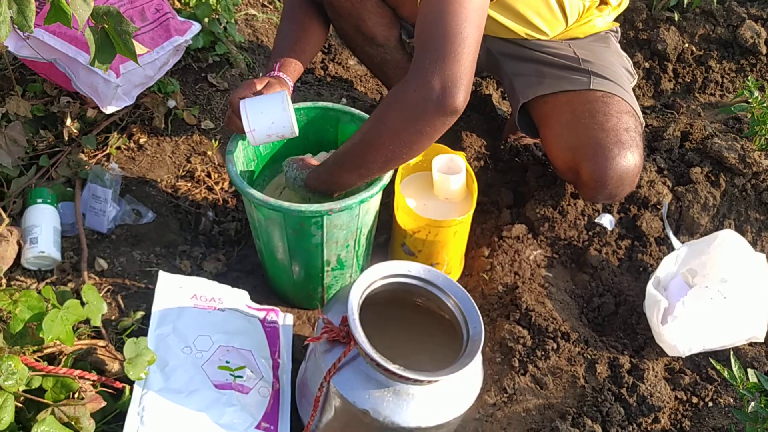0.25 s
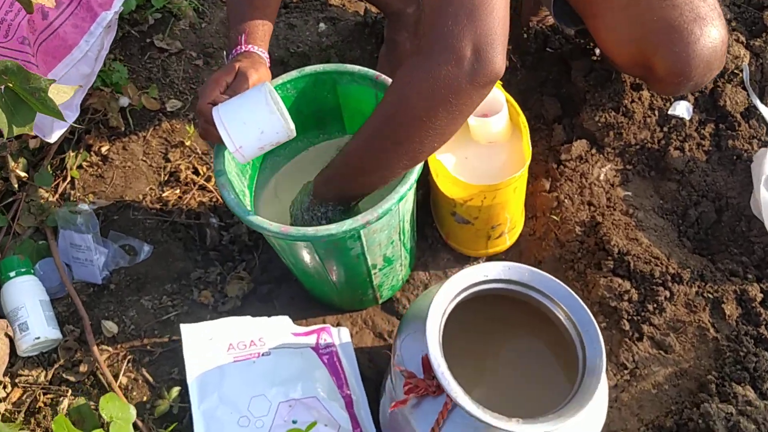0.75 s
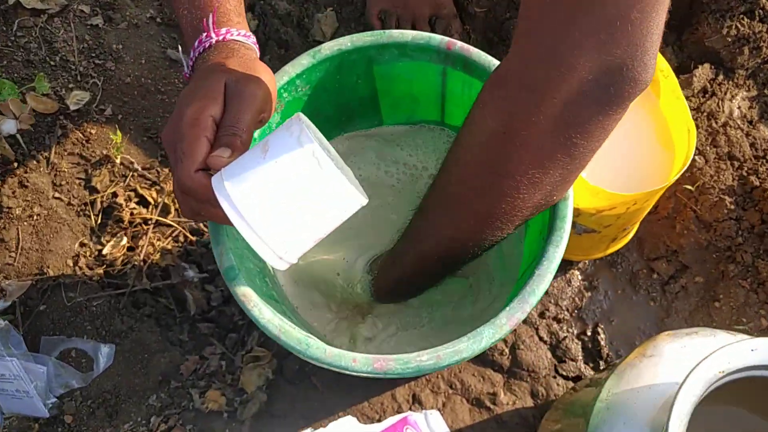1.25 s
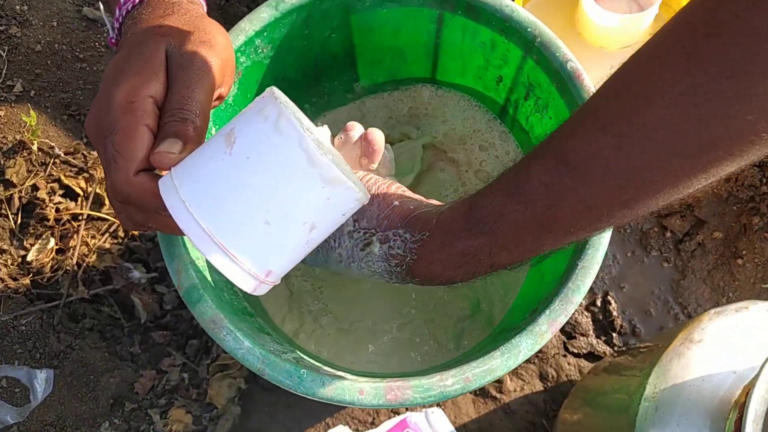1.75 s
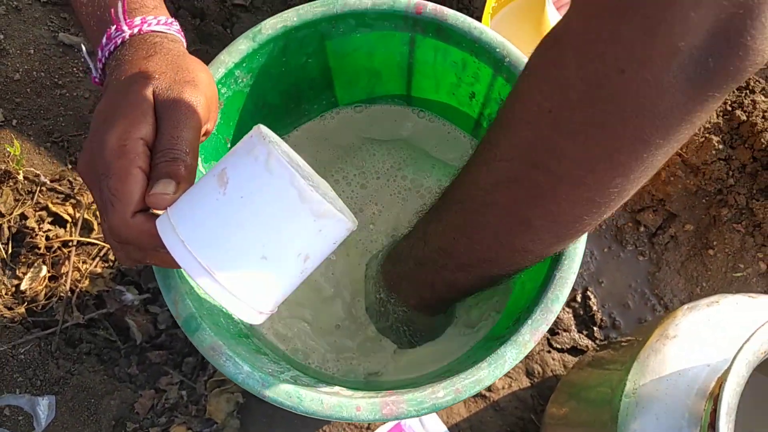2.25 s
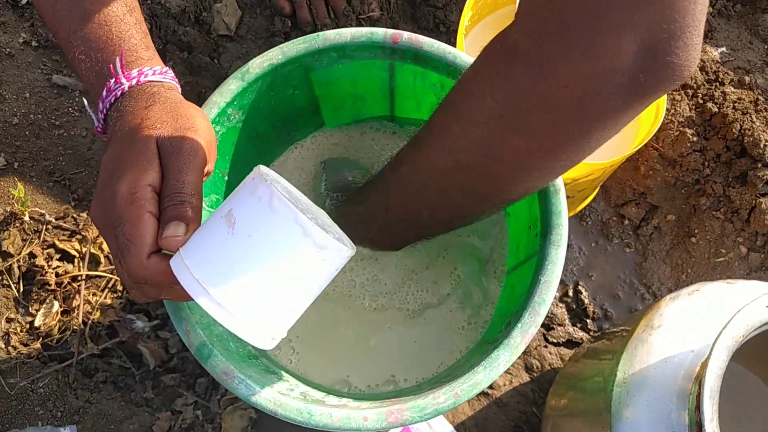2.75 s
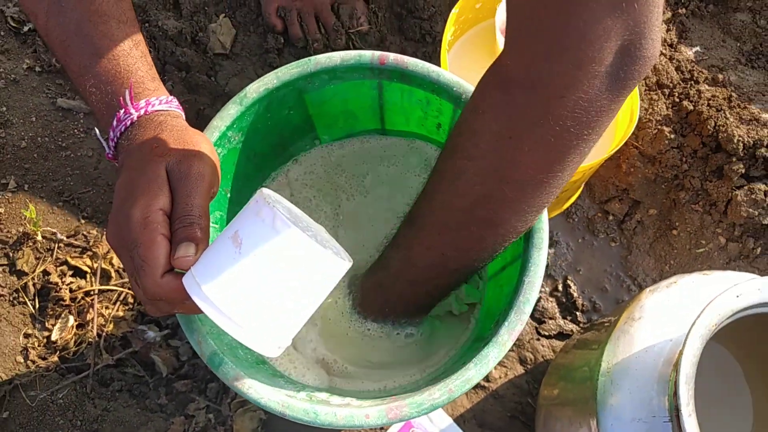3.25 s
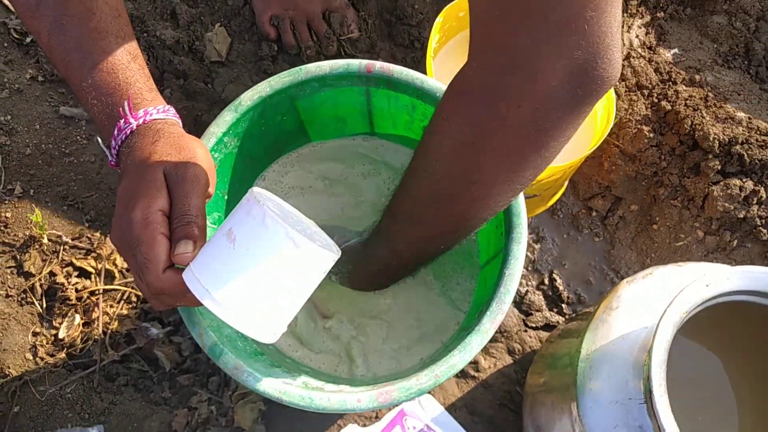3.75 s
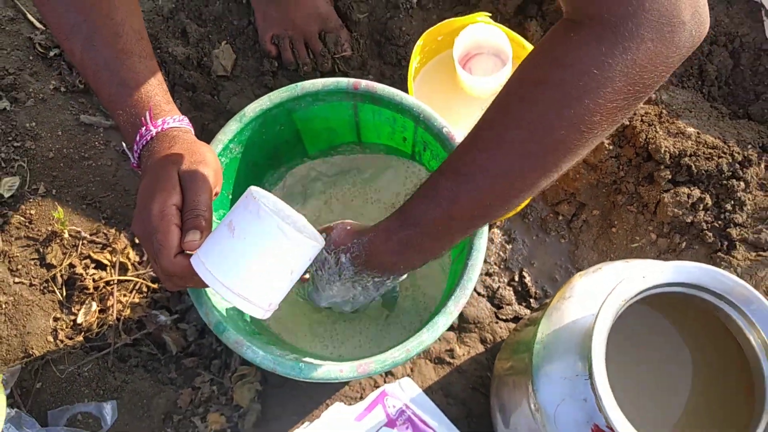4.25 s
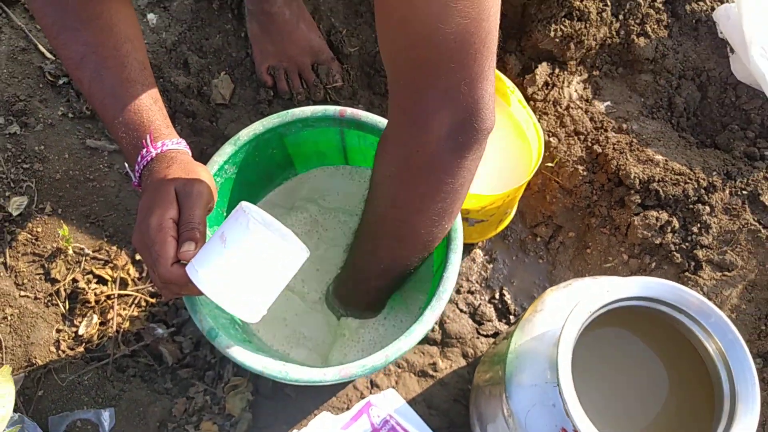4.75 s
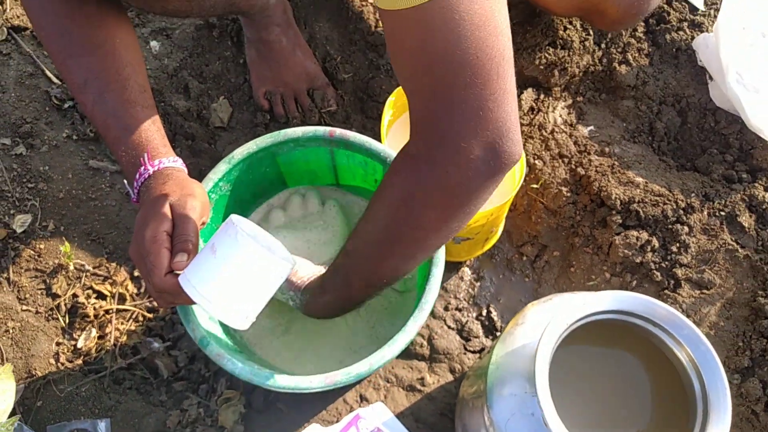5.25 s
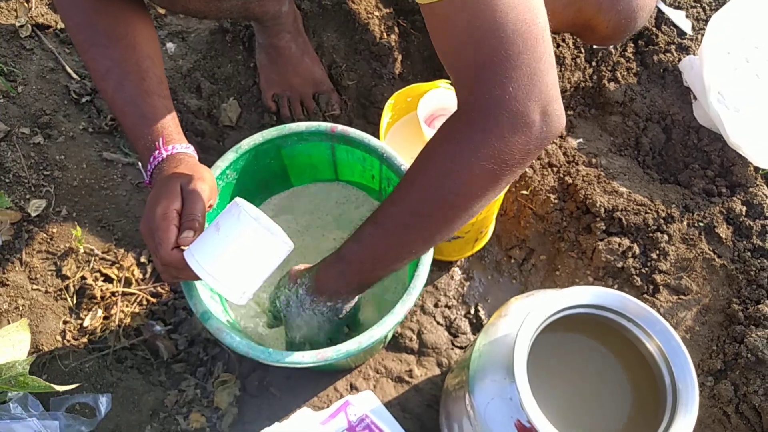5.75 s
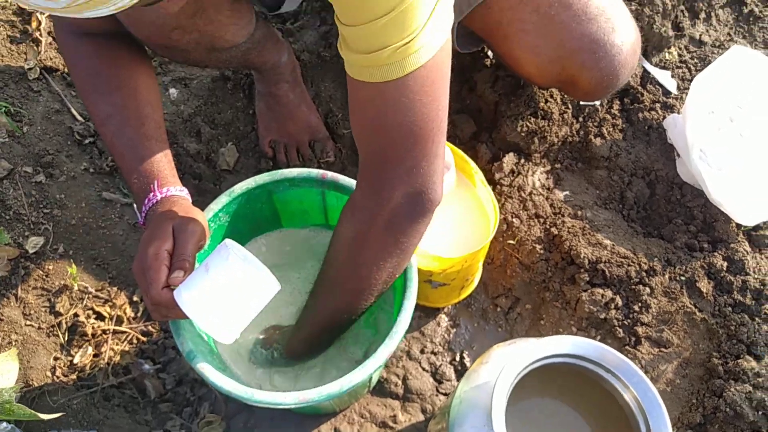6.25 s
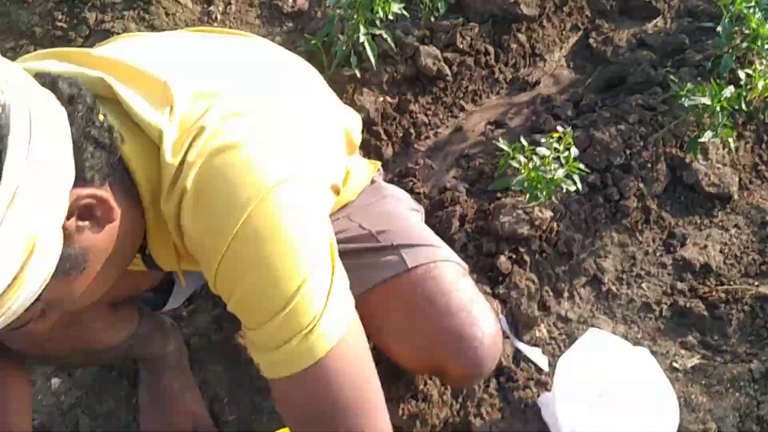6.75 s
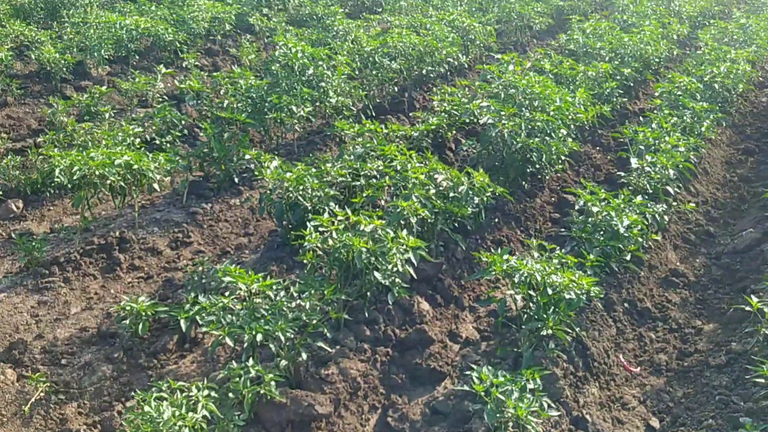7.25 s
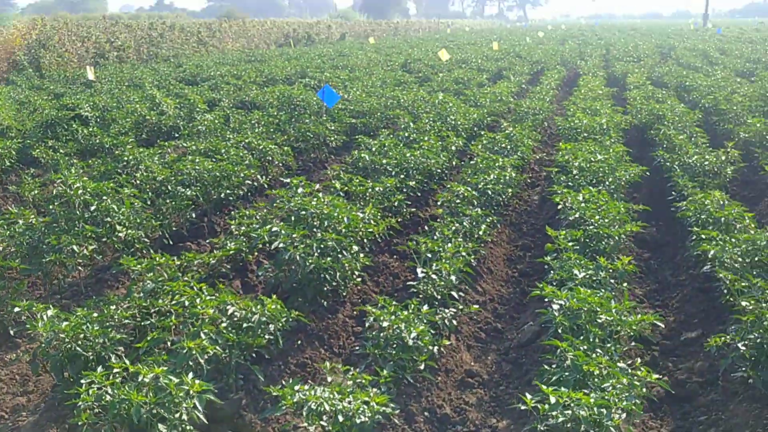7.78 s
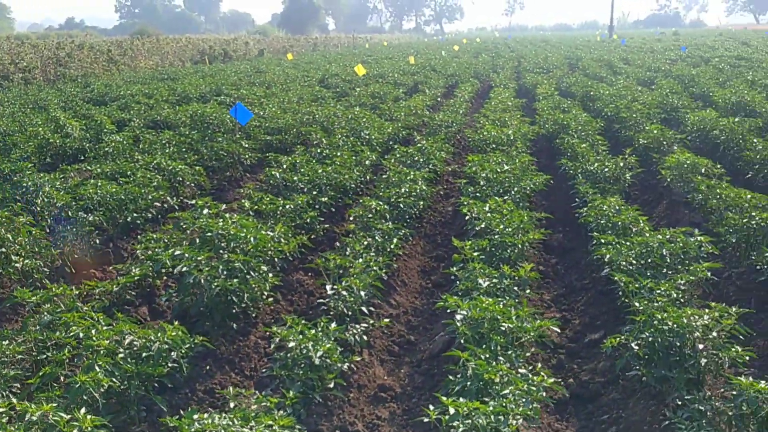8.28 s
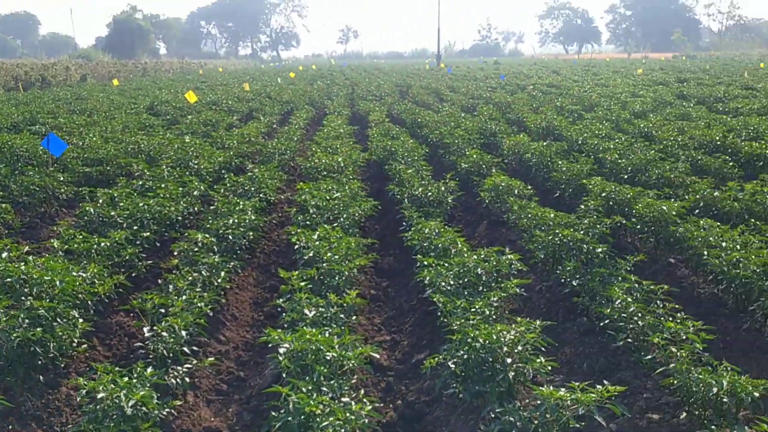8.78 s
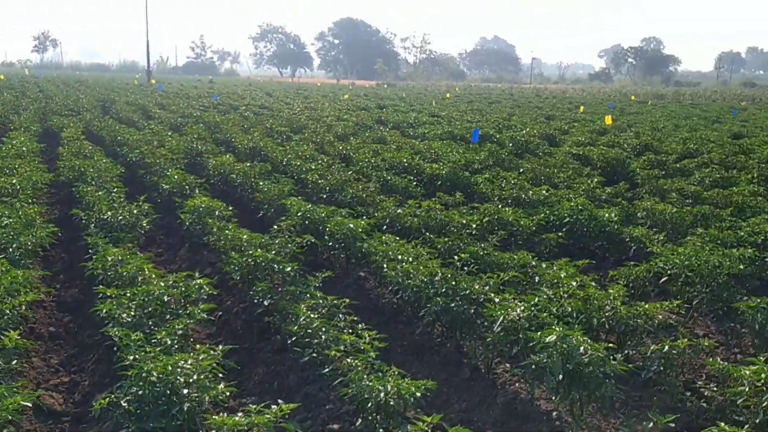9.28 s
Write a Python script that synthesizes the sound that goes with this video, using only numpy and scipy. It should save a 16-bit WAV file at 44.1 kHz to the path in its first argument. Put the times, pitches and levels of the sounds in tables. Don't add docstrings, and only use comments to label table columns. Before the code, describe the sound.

A close stereo phone hears a hand stirring thin slurry in a plastic bucket in an open field, over steady soft hiss and low light wind. At 0.25 s a spatter and one very sharp drop hit the phone at the right, with a lighter one at 0.3. Small swishes follow to 1.2 s. From 1.4 to 2.3 s stirring is busiest, peaking at 1.9 with bright fizz, crackling film snaps and round bubble plops. A lull with deep bubbles leads to wet bursts at 3.1 to 4.6 s. It calms near 5, a faint bird whistling at 5.15, then sloshes again from 5.4 to 7.2. A wind gust rumbles at 6.8 to 7. Distant bird notes rise at 7.3, a drip chirps upward at 7.45, and a small splash comes at 8.0. Quiet hiss remains to 9.5, with an extremely faint falling bird call near 8.9.

```python
import sys
import numpy as np
from scipy import signal
from scipy.fft import irfft
from scipy.io import wavfile
from scipy.ndimage import uniform_filter1d

SR = 44100
rng = np.random.default_rng(int(sys.argv[2]) if len(sys.argv) > 2 else 0)


def gain_from_decibels(decibels):
    exponent = np.asarray(decibels, float) / 20
    return 10 ** exponent


def transcribe(u):
    v = np.clip(np.atleast_2d(u).T, -1, 1)
    q = np.round(v * 32767).astype(np.int16)
    wavfile.write(sys.argv[1], SR, q)


N = 419831

PORT_HZ = 8930
LAG = 12.5
LOW_LAG = 4.4


def read(points, hz):
    f, value = np.transpose(points)
    return np.interp(np.log(hz + 1), np.log(f + 1), value)


def curve(rows):
    s, *columns = np.transpose(rows)
    return [np.interp(np.arange(N) / SR, s, c) for c in columns]


def evened(x):
    return x / np.sqrt(np.mean(x ** 2) + 1e-20)


def coloured(x, db, lag=0):
    hz = np.fft.rfftfreq(2048, 1 / SR)
    log_gain = np.log(gain_from_decibels(np.maximum(db(hz), -80)))
    mirrored = np.r_[log_gain, log_gain[-2:0:-1]]
    phase = -signal.hilbert(mirrored).imag[:len(hz)]
    response = np.exp(log_gain + 1j * (phase - 2 * np.pi * hz * lag / SR))
    return signal.oaconvolve(x, irfft(response))[:N]


def flicker(count):
    return evened(signal.lfilter([1], [1, -np.exp(-2 * np.pi * count / SR)], rng.standard_normal(N)))


def add(mix, s, sound, pan_db=0, lag=LAG):
    for side, late, db in ((0, lag, min(pan_db, 0)), (1, 0.0096, min(-pan_db, 0))):
        part = mix[side, round(s * SR + late):][:len(sound)]
        part += gain_from_decibels(db) * sound[:len(part)]


def ring(hz, t60, rise=0, soft=.001):
    t = np.arange(int(t60 * SR) + 20) / SR
    phase = 2 * np.pi * np.cumsum(hz * (1 + rise * t / t60)) / SR
    sound = np.sin(phase) * gain_from_decibels(-60 * t / t60) * (1 - np.exp(-t / soft))
    return sound / abs(sound).max()


def scattered(sound, per_s, spread_db, cap):
    luck = rng.random((round(per_s * N / SR), 2))
    at = (luck[:, :1] * N).astype(int) + np.arange(len(sound))
    size = gain_from_decibels(spread_db * np.minimum(-np.log(luck[:, 1:] + 1e-9), cap))
    return np.bincount(at.ravel(), (size * sound).ravel(), N)[:N]


def swells(steady_db, rows):
    t = np.arange(0, N, 64) / SR
    power = gain_from_decibels(2 * (steady_db + np.zeros(N))[::64])
    for s, db, rise, fall in rows:
        power = power + gain_from_decibels(2 * db - 40 * np.maximum((s - t) / rise, (t - s) / fall))
    return np.interp(np.arange(N) / SR, t, 10 * np.log10(power))


def churn(size, colour_db, same, lag, clump_db, patch_db, patch_s, patch_hz):
    hop, hz = size // 4, np.fft.rfftfreq(size, 1 / SR)[:, None]
    a, b, c, d, patches = rng.standard_normal((N // hop + 5, len(hz), 5)).T
    patches = uniform_filter1d(patches, max(round(patch_hz / hz[1, 0]), 1), 0)
    patches = evened(uniform_filter1d(patches, max(round(patch_s * SR / hop), 1), 1))
    right = a + 1j * b
    shared = same * right * np.exp(-2j * np.pi * hz * lag / SR)
    left = shared + np.sqrt(1 - same ** 2) * (c + 1j * d)
    z = gain_from_decibels(colour_db(hz) + patch_db * patches) * np.array([left, right])
    noise = signal.istft(z, nperseg=size, noverlap=size - hop)[1][:, :N]
    return evened(gain_from_decibels(clump_db * flicker(count=22)) * noise)


# (frequency [Hz], level [dB per Hz])
WIND_COLOUR = [(12, -31.5), (20, -2), (33, -5), (50, 4), (70, -3), (160, -14), (300, -30.5), (390, -61),
               (660, -120)]
# (crest time [s], crest level [dB], rise per 20 dB [s], fall per 20 dB [s])
LEFT_GUSTS = [
    (1.11, -46, .5, .4),
    (6.8, -40, .08, .35),
    (6.95, -43, .2, .2),
]
RIGHT_GUSTS = [
    (.79, -54, 1.5, .9),
    (1.11, -55, .5, .6),
    (3.26, -59, 3, 1.5),
    (6.95, -48.5, .2, .3),
    (7.21, -50, .4, .3),
]


def wind():
    ports = ((-60.5, LEFT_GUSTS), (-61.5, RIGHT_GUSTS))
    db = np.array([swells(breeze_db, gusts) for breeze_db, gusts in ports])
    left, right, common = rng.standard_normal((3, N))
    rumble = [evened(coloured(own + 0.3 * common, lambda hz: read(WIND_COLOUR, hz))) for own in (left, right)]
    return gain_from_decibels(db - 3.7) * rumble


# (frequency [Hz], level [dB per Hz])
HISS_COLOUR = [(59, -23.5), (100, 0.5), (570, -9), (721, -10.5), (1230, -15.5), (2130, -17.5), (2630, -21),
               (4200, -20.5), (9000, -13.5), (10600, -23), (16000, -29)]


def hiss():
    out = [coloured(rng.standard_normal(N), lambda hz: read(HISS_COLOUR, hz)) for _ in "lr"]
    return gain_from_decibels(-71.5 + 4.0) * evened(np.array(out))


# (time [s], steady spray level [dB], gurgle above its share of the spray [dB])
STIR = [(0.0, -69.0, -4.0), (0.3, -61.0, -5.0), (0.8, -83.0, -4.0), (1.2, -59.0, -6.0), (1.45, -49.0, -3.0),
        (1.75, -79.0, -9), (2.0, -48.0, -12.5), (2.25, -74.0, -6.5), (2.7, -78.0, -0.5), (3.0, -58.0, -9.0),
        (3.4, -67.0, -1.0), (3.6, -63.0, -7.0), (4.6, -74.0, -5.5), (5.3, -79.0, -8.0),
        (5.75, -62.0, -13.0), (6.6, -58, -3.5), (7.4, -75.0, -1.0), (9.52, -74.0, -24)]
# (crest time [s], crest level [dB], last 20 dB of rise [s], first 20 dB of fall [s])
SPLASHES = [(0.262, -50, 0.012, 0.09), (0.429, -47.5, 0.18, 0.35), (0.828, -50.5, 0.02, 0.1),
            (1.019, -44.0, 0.12, 0.21), (1.676, -42.5, 0.32, 0.42), (1.905, -35.0, 0.09, 0.2),
            (2.158, -42, 0.14, 0.03), (2.327, -46.0, 0.15, 0.03), (2.575, -55.0, 0.6, 0.41),
            (2.818, -54.0, 0.05, 0.04), (3.087, -47.5, 0.04, 0.06), (3.386, -44.0, 0.29, 0.09),
            (3.606, -49.0, 0.02, 0.13), (3.751, -42.5, 0.05, 0.06), (3.889, -49.5, 0.04, 0.29),
            (4.041, -42.5, 0.07, 0.18), (4.303, -45.5, 0.4, 0.05), (4.561, -48.0, 0.05, 0.1),
            (5.237, -60.5, 0.86, 0.28), (5.429, -47.0, 0.12, 0.1), (5.609, -41.0, 0.19, 0.12),
            (5.908, -48.5, 0.02, 0.08), (6.032, -51.5, 0.03, 0.08), (6.129, -42.0, 0.06, 0.03),
            (6.286, -49.5, 0.02, 0.26), (6.622, -45.0, 0.09, 0.29), (6.91, -43.0, 0.08, 0.16),
            (7.175, -52, 0.04, 0.06), (7.736, -65.0, 0.09, 0.14), (7.999, -48.0, 0.05, 0.36)]


def spray_db():
    return swells(curve(STIR)[0], SPLASHES)


def kicked():
    lull_db, kick_s = -4.5, .02
    tears = np.zeros(N)
    tears[[round(row[0] * SR) for row in SNAPS + PLINKS + CRACKS]] = 1
    kick = np.minimum(signal.lfilter([1], [1, -np.exp(-1 / (kick_s * SR))], tears), 1)
    return gain_from_decibels(lull_db * (1 - kick))


# (frequency [Hz], level [dB per Hz])
SPRAY_COLOUR = [(880, -28), (1500, -7), (3180, -6.5), (4300, -6), (6690, -7), (9220, 4), (10400, -5),
                (15200, -21.5), (16000, -25), (16500, -42)]


def spray_colour_db(hz):
    return read(SPRAY_COLOUR, hz)


def spits():
    decay = gain_from_decibels(-60 * np.arange(900) / SR / .014)
    bursts = scattered(decay, 70, 4.5, 2.4) * rng.standard_normal((2, N))
    return evened(np.array([coloured(x, spray_colour_db) for x in bursts]))


def droplets():
    out = np.zeros((2, N))
    for hz in np.geomspace(1300, 7500, 20):
        drop = np.sqrt(hz) * ring(hz, 30 / hz + .004, .15, soft=1.5 / hz)
        drops = scattered(drop, 18, 4.5, 2.6)
        out += [np.roll(drops, rng.integers(4, 14)), drops]
    return evened(out)


def spray():
    fizz = churn(size=256, colour_db=spray_colour_db, same=0.28, lag=LAG,
                 clump_db=4.0, patch_db=5.0, patch_s=.009, patch_hz=700)
    pop_size = gain_from_decibels(2.8 * np.minimum(rng.exponential(1, N), 3.5))
    pops = pop_size * (rng.random(N) < 350 / SR) * rng.choice([-1, 1], N)
    pops = evened(np.array([coloured(pops, spray_colour_db, lag) for lag in (LAG, 0)]))
    mixed = .9 * fizz + .25 * pops + .33 * spits() + .4 * droplets()
    return gain_from_decibels(spray_db() + 4.3) * kicked() * mixed


# (frequency [Hz], width [Hz], level [dB])
BUCKET = [(400, 43, -0.5), (870, 37, 2.5), (1216, 280, -1), (1600, 210, -13), (2800, 1100, -3)]


def bucket_db(hz):
    return 10 * np.log10(sum(gain_from_decibels(2 * db) / (1 + (2 * (hz - f) / w) ** 2) ** 1.47 for f, w, db in BUCKET))


def gurgle():
    share, usual_db = .7, -55
    level_db = usual_db + share * (spray_db() - usual_db) + curve(STIR)[1]
    slosh = churn(size=512, colour_db=bucket_db, same=0.98, lag=LOW_LAG,
                  clump_db=5.5, patch_db=5.0, patch_s=.02, patch_hz=200)
    blips = np.zeros(N)
    for hz in np.geomspace(340, 6500, 30):
        blip = ring(hz, 22 / hz + 0.0019, 0.5, soft=2.2 / hz)
        blips += gain_from_decibels(bucket_db(hz)) * np.sqrt(hz) * scattered(blip, 22, 3.5, 2.8)
    blips = evened(np.array([np.roll(blips, 6), blips]))
    return gain_from_decibels(level_db - .6) * np.sqrt(kicked()) * (.8 * slosh + 1.1 * blips)


# (time [s], peak level [dB], left-right [dB])
SNAPS = [(.3898, -31, 20), (.4361, -27.5, 17), (1.4648, -32, -2), (1.5694, -32, 2.5), (1.736, -27.5, 2),
         (1.792, -32, -2), (1.8618, -26, 11), (1.8805, -21.5, 11), (2.1207, -28, -2), (2.254, -35.5, 2),
         (2.5154, -41, 21), (2.6066, -31, 1.5), (3.344, -22, -2), (3.3668, -22, 6.5), (3.355, -26, 0),
         (3.6152, -29.5, 10), (3.904, -33, 23), (3.967, -33, -3), (4.145, -33.5, 14), (4.2249, -20, 3),
         (4.3087, -30, 3), (4.5176, -32.5, 5), (4.57, -25.5, 4), (5.2218, -33, 1), (5.4078, -32, 3.5),
         (5.483, -33.5, 11), (5.5445, -24, 9.5), (5.6167, -22, -1), (5.887, -39.5, 5), (6.136, -29, 3)]
# (time [s], peak level [dB], left-right [dB], plink [Hz])
PLINKS = [(.0921, -39, .5, 2280), (.823, -42, -2, 2620), (1.6625, -26.5, 7, 5280), (1.716, -31.5, .5, 5700),
          (2.0302, -31, 4, 2980), (2.149, -35, 2, 3020), (2.6023, -39, 19, 1800), (2.81, -43.5, 6, 1850),
          (3.0925, -29.5, -4.5, 3740), (3.2567, -34.5, -8, 2550), (3.5969, -34.5, 2, 2730),
          (3.6678, -36, 1, 3100), (3.736, -33.5, 7, 3000), (4.0522, -28.5, .5, 3730),
          (4.1003, -32.5, 5, 2500), (4.2543, -31.5, 15, 2020), (4.5503, -34, 2, 3210),
          (4.712, -42, 3, 3000), (4.9208, -41, -1, 4530), (5.029, -41, 0, 4840), (5.136, -40, 3, 6000),
          (5.3458, -44, 0, 2110), (5.5236, -33.5, 9, 4170), (5.916, -37, 4, 3670), (6.282, -36, 5, 2750),
          (6.8944, -35, -6, 5000), (6.9101, -28, 1, 2200), (7.1626, -35, -2, 4970),
          (7.1885, -37, 1.5, 2300)]


def snaps():
    out, t = np.zeros((2, N)), np.arange(1500) / SR
    thin = [(*row, rng.uniform(2200, 4800), -26) for row in SNAPS]
    thick = [(*row, -13) for row in PLINKS]
    rows = thin + thick
    port = ring(PORT_HZ, 0.002, soft=0.00011)
    port[:60] += 0.33 * ring(11800, 0.0012, soft=0.0001)[:60]
    for (s, db, pan_db, plink_hz, plink_db), luck in zip(rows, rng.random((len(rows), 2))):
        dying = gain_from_decibels(-60 * t / (0.007 + 0.014 * luck[0]))
        hissing, dull, tearing = rng.standard_normal((3, len(t))) * dying * (1 - np.exp(-t / .0005))
        clicks = tearing * (rng.random(len(t)) < 1300 / SR)
        clicks[8] = 1.35
        sound = np.convolve(clicks, port)[:len(t)]
        sound += 0.23 * signal.lfilter(*signal.iirpeak(PORT_HZ, 1.3, SR), hissing)
        plink = signal.lfilter(*signal.iirpeak(plink_hz, 4.0, SR), dull)
        sound = sound / abs(sound).max() + gain_from_decibels(plink_db + 8) * plink / abs(plink).max()
        add(out, s, gain_from_decibels(db + 9.5) * sound, pan_db, LAG * (.6 + .5 * luck[1]))
    return out


# (time [s], peak level [dB], pitch [Hz])
BUBBLES = [(.29, -31.5, 1103), (.841, -43.5, 1590), (1.59, -37, 1200), (1.609, -32, 1140),
           (1.644, -24, 1183), (1.663, -29, 1420), (1.716, -41, 1140), (1.744, -36.5, 2135),
           (1.771, -38.5, 1290), (1.859, -35.5, 2380), (1.899, -36.5, 1090), (2.084, -41, 2190),
           (2.308, -31.5, 2200), (2.447, -38, 2370), (3.069, -41, 1280), (3.344, -41, 1090),
           (3.737, -42, 1230), (4.031, -36, 2400), (4.057, -38, 1613), (4.257, -35.5, 1970),
           (4.547, -40, 1530), (4.571, -41, 1405), (5.444, -42, 1780), (5.562, -40.5, 1690),
           (6.544, -41.5, 1420), (6.644, -39, 1500), (6.718, -40, 1550), (6.779, -37, 1120),
           (7.001, -42, 1400), (7.156, -41.5, 1590)]
# (time [s], peak level [dB], pitch [Hz])
MIDDLE_BUBBLES = [(.092, -46, 1750), (.476, -44.5, 910), (1.112, -40, 910), (1.46, -39.5, 870),
                  (2.639, -37, 874), (2.878, -42, 790), (3.09, -42.5, 840), (3.253, -44.5, 874),
                  (4.326, -44.5, 1156), (5.306, -46, 1440), (5.425, -39.5, 960), (5.539, -44.5, 1126),
                  (6.105, -35.5, 860), (6.106, -42, 1855), (6.28, -46, 1330), (6.428, -46, 840),
                  (6.758, -36.5, 894), (7.05, -44, 867), (7.332, -48.5, 935), (7.965, -46, 1580),
                  (7.436, -54, 1900), (7.448, -51, 2000), (7.33, -53, 1350), (5.274, -52, 2400),
                  (5.432, -44, 1150), (5.405, -48, 1050), (5.462, -48, 1000), (5.572, -45, 2700),
                  (5.508, -46, 3300), (8.037, -50, 3900), (8.094, -50, 3100), (7.99, -51, 3200),
                  (8.058, -53, 3100), (8.022, -46.5, 930)]
# (time [s], peak level [dB], pitch [Hz], decay by 60 dB [s])
DEEP_BUBBLES = [(1.358, -49, 400, .089), (1.418, -42, 610, .032), (1.439, -46.5, 380, .05),
                (2.514, -47, 505, .079), (2.671, -45, 350, .07), (2.714, -40.5, 420, .022),
                (2.815, -47, 386, .089), (3.039, -40, 375, .037), (3.074, -39, 385, .056),
                (3.745, -34, 420, .05), (3.739, -28.5, 540, .04), (3.898, -45.5, 418, .069),
                (4.053, -44, 382, .073), (4.23, -44.5, 394, .045), (4.521, -46, 434, .089),
                (5.621, -45.5, 431, .089), (6.123, -40, 410, .025), (6.297, -41, 390, .045),
                (6.381, -43.5, 473, .042), (6.572, -47, 482, .041), (7.053, -46, 640, .03),
                (7.189, -47.5, 624, .064), (7.717, -45, 376, .04), (8.019, -48.5, 406, .038)]


def bubbles():
    out = np.zeros((2, N))
    small = [(s, db, hz, 0.027 + 25 / hz) for s, db, hz in BUBBLES + MIDDLE_BUBBLES]
    rows = DEEP_BUBBLES + small
    for (s, db, hz, t60), luck in zip(rows, rng.random((len(rows), 5))):
        main = ring(hz, t60, 0.062 * luck[0], soft=0.71 / hz)
        add(out, s, gain_from_decibels(db - 1.5) * main, lag=LOW_LAG)
        for late, detune in (luck[1:3], luck[3:]):
            neighbour = ring(hz * (0.742 + 0.605 * detune), 0.55 * t60, 0.0804, soft=0.64 / hz)
            add(out, s + .02 * late, gain_from_decibels(db - 6.5) * neighbour, lag=LOW_LAG)
    return out


# (time [s], peak level [dB], pitch [Hz])
KNOCKS = [
    (0.2682, -30, 346),
    (.309, -35.5, 310),
    (7.19, -40.5, 120),
]
# (time [s], peak level [dB])
TICKS = [
    (.2519, -26),
    (.2532, -19),
    (.2545, -15),
    (.2561, -16),
    (.257, -16),
    (.258, -18),
    (.2608, -24),
    (.2659, -1.6),
    (.3088, -17),
]


def knocks():
    out = np.zeros((2, N))
    for s, db, hz in KNOCKS:
        add(out, s, gain_from_decibels(db) * ring(hz, 0.019, -.4, soft=0.00029), -12, 0)
    tick = ring(PORT_HZ, .0021, soft=.0002)
    tick[:40] += .7 * ring(6800, .0011, soft=.0002)[:40]
    tick[:40] += .12 * ring(13500, .0005, soft=.0001)[:40]
    for s, db in TICKS:
        add(out, s, gain_from_decibels(db) * tick / abs(tick).max(), -26, 0)
    return out


# (time [s], peak level [dB], start pitch [Hz])
CHIRPS = [(0.285, -44.0, 3100.0), (0.323, -45.0, 1250.0), (0.388, -45.0, 2630.0), (0.826, -45.0, 2610.0),
          (1.501, -44.0, 2330.0), (1.527, -46.0, 1790.0), (1.608, -46.0, 2690.0), (1.637, -39.0, 3790.0),
          (1.726, -41.0, 1100.0), (1.775, -44.0, 2370.0), (1.851, -39.0, 2910.0), (1.852, -42.0, 3190.0),
          (1.855, -37.0, 4110.0), (1.858, -41.0, 1140.0), (1.859, -39, 4350), (1.861, -41.0, 880.0),
          (1.862, -42.0, 4720.0), (1.901, -42.0, 4540.0), (1.904, -40.0, 4160.0), (1.938, -38.0, 2970.0),
          (1.973, -45.0, 840.0), (1.993, -41.0, 2890.0), (2.05, -44.0, 4570.0), (2.125, -43.0, 3420.0),
          (2.556, -44.0, 3420.0), (2.634, -46.0, 3190.0), (2.65, -41, 860), (3.08, -41.0, 4010.0),
          (3.247, -37.0, 2610.0), (3.343, -44.0, 1360.0), (3.344, -43.0, 3900.0), (3.344, -42.0, 4090.0),
          (3.755, -37.0, 2910.0), (3.942, -47.0, 1440.0), (4.019, -42.0, 970.0), (4.033, -43.0, 1120.0),
          (4.096, -43.0, 2520.0), (4.115, -44.0, 900.0), (4.132, -43.0, 1060.0), (4.155, -46.0, 1210.0),
          (4.222, -43.0, 3940.0), (4.223, -46.0, 3550.0), (4.604, -48.0, 1310.0), (5.262, -48, 500),
          (5.27, -50, 850), (5.557, -43.0, 2430.0), (5.913, -44.0, 3730.0), (6.101, -46.0, 3770.0),
          (6.104, -41.0, 1310.0), (6.112, -40, 860), (6.313, -42.0, 2780.0), (6.577, -44.0, 880.0),
          (6.596, -41.0, 1340.0), (6.633, -45.0, 2560.0), (6.641, -45.0, 1180.0), (6.741, -43.0, 1140.0),
          (6.776, -42, 1000), (6.85, -47, 800), (6.911, -44.0, 1180.0), (7.44, -50, 1100)]


def chirps():
    out = np.zeros((2, N))
    for (s, db, hz), luck in zip(CHIRPS, rng.random(len(CHIRPS))):
        chirp = ring(.97 * hz, .018 + 16 / hz, .1 + .25 * luck, soft=2.5 / hz)
        add(out, s, gain_from_decibels(db + .2) * chirp, lag=LOW_LAG + hz / 600)
    return out


# (time [s], peak level [dB], left-right [dB])
CRACKS = [(0.8329, -37.0, -3.0), (0.9362, -37.0, 11.0), (1.0708, -34.0, 5.0), (1.0857, -33.0, 7.0),
          (1.3128, -37.0, 2.0), (1.3287, -37.0, 3.0), (1.3828, -32.0, 4.0), (1.6128, -27.0, -4.0),
          (1.6437, -35.0, 3.0), (1.6921, -28.0, -6.0), (1.7297, -30.0, -7.0), (1.7473, -30.0, 6.0),
          (1.8015, -32.0, 14.0), (1.845, -30.0, 1.0), (1.9784, -27.0, 8.0), (2.009, -30.0, 5.0),
          (2.0501, -31.0, 1.0), (2.0685, -34.0, 5.0), (2.1099, -33.0, 9.0), (2.158, -29.0, 1.0),
          (2.1641, -33.0, 4.0), (2.2372, -38.0, 5.0), (2.3425, -37.0, 3.0), (2.447, -36.0, 5.0),
          (2.7663, -40.0, 4.0), (3.3294, -36.0, 5.0), (3.3498, -27, 3), (3.3905, -27.0, 5.0),
          (3.6224, -30.0, 14.0), (3.7568, -30.0, 5.0), (3.7665, -31.0, 2.0), (3.911, -27.0, 13.0),
          (3.9883, -35.0, 0.0), (4.028, -31.0, 4.0), (4.1112, -31.0, 5.0), (4.1823, -33.0, 6.0),
          (4.2037, -32.0, 19.0), (4.2718, -32.0, 4.0), (4.577, -28.0, 4.0), (5.0475, -37.0, 6.0),
          (5.1194, -41.0, 7.0), (5.4739, -33.0, 8.0), (5.5379, -27.0, 12.0), (5.6282, -31.0, 11.0),
          (5.6711, -32.0, 8.0), (5.8389, -40.0, 2.0), (5.9757, -38.0, 1.0), (6.0455, -28.0, 12.0),
          (6.2923, -28.0, 8.0), (6.3189, -37.0, 3.0), (6.3887, -35.0, 3.0), (6.4588, -34.0, 3.0),
          (6.613, -32.0, 0.0), (6.6525, -25.0, 7.0), (6.9781, -34.0, -1.0), (7.0529, -40.0, 3.0),
          (7.0737, -39.0, -5.0), (7.1545, -40, 0), (7.2525, -46, 0), (7.9985, -36.0, -1.0)]


def cracks():
    out, t = np.zeros((2, N)), np.arange(500) / SR
    for (s, db, pan_db), luck in zip(CRACKS, rng.random((len(CRACKS), 3))):
        dying = gain_from_decibels(-60 * t / (.006 + .006 * luck[0])) * (1 - np.exp(-t / .0004))
        tail = coloured(rng.standard_normal(len(t)) * dying, spray_colour_db)[:len(t)]
        click = ring(PORT_HZ * (.9 + .2 * luck[1]), .003, soft=.0002)
        sound = .6 * tail / abs(tail).max()
        sound[10:][:len(click)] += .7 * click
        add(out, s, gain_from_decibels(db + 5) * sound, pan_db - 2.5, LAG * (.6 + .5 * luck[2]))
    return out


def glides(rows, lag, rough):
    out = np.zeros((2, N))
    for s, db, from_hz, to_hz, length in rows:
        hz = np.geomspace(from_hz, to_hz, int(length * SR))
        hz *= 1 + rough * uniform_filter1d(rng.standard_normal(len(hz)), size=120)
        sound = np.sin(2 * np.pi * np.cumsum(hz) / SR) * np.hanning(len(hz))
        add(out, s, gain_from_decibels(db) * sound, lag=lag)
    return out


# (time [s], peak level [dB], start pitch [Hz], end pitch [Hz], length [s])
DRIPS = [
    (2.888, -64, 870, 1400, 0.024),
    (7.45, -48, 900, 2300, 0.042),
]


def drips():
    return glides(DRIPS, LOW_LAG, 0.35)


# (time [s], peak level [dB], start pitch [Hz], end pitch [Hz], length [s])
BIRDS = [
    (5.145, -58, 3750, 5300, 0.105),
    (7.295, -59, 3900, 4750, 0.055),
    (7.34, -58, 4500, 5200, 0.035),
    (7.365, -60, 5000, 6100, 0.025),
    (7.385, -61, 6500, 6000, 0.025),
    (8.94, -69, 2250, 2200, 0.034),
    (8.97, -68, 2230, 2020, 0.073),
    (8.73, -71, 2680, 2800, 0.036),
]


def birds():
    return glides(BIRDS, 3, 0.1)


def bucket_wall(near):
    wall = np.zeros((2, 700))
    wall[:, 0] = 1
    late = np.arange(40, 700, 23)
    wall[:, late] = gain_from_decibels(-19 - 60 * late / SR / .03) * rng.choice([-1, 1], (2, len(late)))
    return signal.oaconvolve(near, wall, axes=1)


# (frequency [Hz], left-right [dB])
PORT_TILT = [(300, -2.5), (2500, -2.5), (5000, -0.5), (8000, 2), (14000, 9.5)]


def ports(near):
    return [coloured(x, lambda hz: sign * read(PORT_TILT, hz) / 2) for x, sign in zip(near, (1, -1))]


def scene():
    near = spray() + gurgle() + snaps() + bubbles() + chirps() + cracks() + drips()
    far = wind() + hiss() + knocks() + birds()
    return ports(bucket_wall(near)) + far


def low_pass(x):
    return signal.sosfilt(signal.butter(12, 16840, fs=SR, output="sos"), x)


def record(dry):
    limited = signal.oaconvolve(dry, signal.firwin(255, 16200, fs=SR)[None], "same")
    return low_pass(limited)


dry = scene()
out = record(dry)
transcribe(out)
```